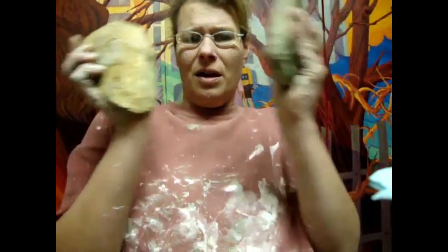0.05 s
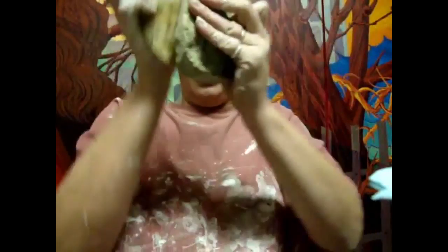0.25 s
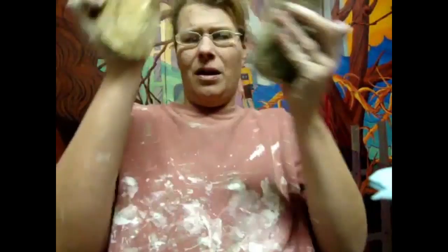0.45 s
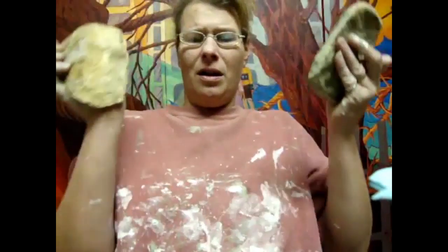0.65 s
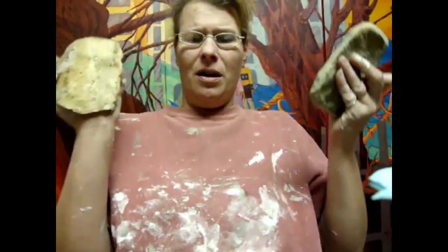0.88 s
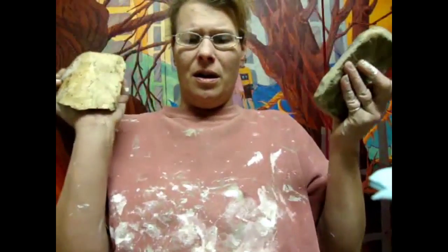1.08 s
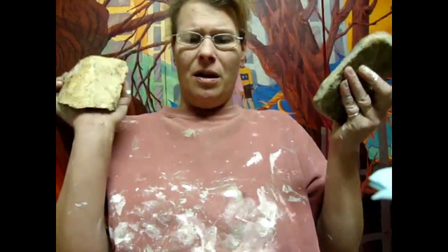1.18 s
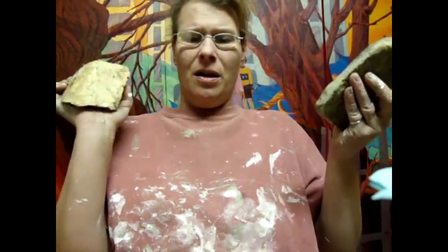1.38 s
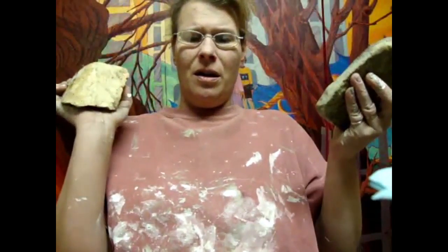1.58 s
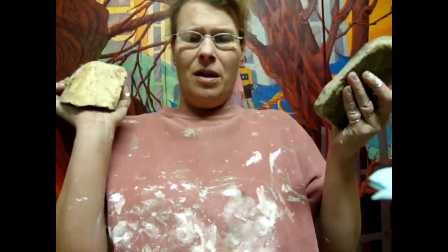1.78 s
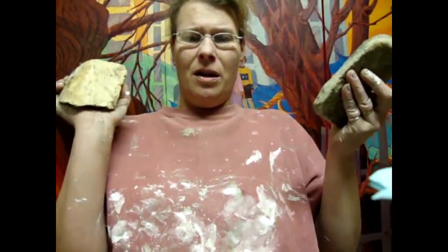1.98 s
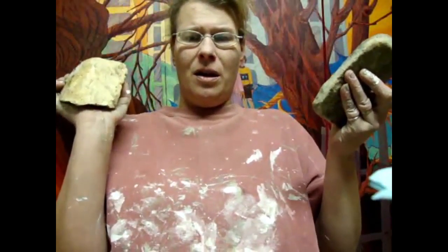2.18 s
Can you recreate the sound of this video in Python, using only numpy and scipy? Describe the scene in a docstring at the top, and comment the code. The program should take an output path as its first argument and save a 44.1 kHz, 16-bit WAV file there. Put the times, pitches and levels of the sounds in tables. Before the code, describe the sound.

A single sharp knock of stone on stone, with a short room echo.

```python
"""One sharp knock of two hand-held rocks, in a quiet, hard-walled room.
The contact sends a single pressure pulse straight to the microphone, with a little grit and a brief
ring of the stones. From farther off, the walls return a few strong echoes and a dense tail.
The knock overloads the microphone; its hiss and faint background noise lie underneath."""
import sys
import numpy as np
from scipy import signal
from scipy.fft import rfft, irfft
from scipy.io import wavfile
from scipy.ndimage import uniform_filter1d

SR = 44100
rng = np.random.default_rng(int(sys.argv[2]) if len(sys.argv) > 2 else 0)


def int16_out(signal):
    """Quantize to a 16-bit WAV file."""
    q = np.round(np.clip(np.atleast_2d(signal).T, -1, 1) * 32767)
    wavfile.write(sys.argv[1], SR, q.astype(np.int16))


N = 99225
KNOCK_S = .2418


def amp(db):
    """Decibels to gain."""
    return 10 ** (np.asarray(db) / 20)


def unit_rms(x):
    """Scales to rms 1."""
    return x / np.sqrt(np.mean(x ** 2) + 1e-20)


def value_at(points, hz):
    """Reads a table on a log-frequency axis."""
    table_hz, value = np.transpose(points)
    return np.interp(np.log(hz + 1), np.log(table_hz + 1), value)


def add(mix, start_s, sound):
    """Mixes a sound in at start_s."""
    part = mix[round(start_s * SR):][:len(sound)]
    part += sound[:len(part)]


def coloured(noise, spectrum):
    """Gives a noise its spectrum, at rms 1."""
    gain = amp(value_at(spectrum, np.fft.rfftfreq(len(noise), 1 / SR)))
    return unit_rms(irfft(rfft(noise) * gain, len(noise)))


def band(x, low_hz, top_hz):
    """Gentle high-pass and steeper low-pass."""
    x = signal.lfilter(*signal.butter(1, low_hz, "high", fs=SR), x)
    return signal.lfilter(*signal.butter(2, min(top_hz, SR / 2 - 1), fs=SR), x)


def microphone_hiss(level_db=-60.5):
    """The microphone's own steady noise floor."""
    # hiss spectrum: frequency_hz, relative_db
    spectrum = [(30, -10.5), (300, -7), (1000, 0), (2500, 0.5), (5000, 0), (8000, 0.5), (9900, -0.5),
                (10250, -14), (16000, -14.5)]
    return amp(level_db) * coloured(rng.standard_normal(N), spectrum)


def background_noise(patch_db=1):
    """Faint background noise; the recorder's gain ducks it after the knock, then slowly recovers."""
    # background noise spectrum: frequency_hz, relative_db
    spectrum = [(20, -9), (60, -10.5), (130, -4.5), (250, 1), (550, 0), (1000, -3.5), (2000, -9),
                (4000, -15.5), (9000, -41.5), (16000, -58.5)]
    # noise level as the recorder's gain ducks and recovers: time_s, level_db
    levels = [(0, -61.5), (.24, -61.5), (.5, -69.5), (.7, -74.5), (.8, -64), (1.1, -64.5), (1.301, -61.5),
              (1.799, -59), (2.25, -57.5)]
    bins = signal.stft(rng.standard_normal(N), nperseg=1024)[2]
    patches = uniform_filter1d(rng.standard_normal(bins.shape), size=8, axis=0)  # smooth in frequency
    patches = unit_rms(uniform_filter1d(patches, size=6, axis=1))  # and in time
    shifting = signal.istft(bins * amp(patch_db * patches), nperseg=1024)[1][:N]
    level_db = np.interp(np.arange(N) / SR, *np.transpose(levels))
    return amp(level_db) * coloured(shifting, spectrum)


def reflections(per_s=2000, diffuse_db=-1.5, clump_db=.7):
    """One second of separate reflections over a diffuse wash, arriving in clumps."""
    clumps = unit_rms(uniform_filter1d(rng.standard_normal(SR), size=70))
    taps = unit_rms(np.sign(rng.standard_normal(SR)) * (rng.random(SR) < per_s / SR))
    wash = amp(diffuse_db) * rng.standard_normal(SR)
    return (taps + wash) * amp(clump_db * clumps)


def room_decay(sound, build_s=.0022, sag_s=.087, sag_db=8):
    """Sound between the walls builds up, sags, then dies away band by band."""
    # the room's reverberation time: frequency_hz, t60_s
    decay_times = [(60, .4), (300, 0.36), (900, 0.45), (2000, 0.4), (4000, 0.29), (8000, 0.27),
                   (15000, 0.37)]
    hz, t, bins = signal.stft(sound, SR, nperseg=256)
    early_db = sag_db * np.minimum(t / sag_s, 1)
    late_db = 60 * np.maximum(t - sag_s, 0) / value_at(decay_times, hz)[:, None]
    fading = signal.istft(bins * amp(-early_db - late_db), SR, nperseg=256)[1][:len(sound)]
    build_up = 1 - np.exp(-np.arange(len(fading)) / SR / build_s)
    return fading * build_up


def room_tail(wash_db=-14, tones_db=-23):
    """The room's answer to the pulse: a dense wash with a few pitches standing out."""
    # reverberation spectrum: frequency_hz, relative_db
    spectrum = [(40, -43), (120, -34.5), (330, -31.5), (600, -17.5), (950, -5.5), (1400, -2), (2100, 0),
                (3100, -6), (4200, -10), (4900, -12.5), (5400, -21), (7200, -20), (8000, -30.5),
                (10200, -22.5), (12100, -34), (14400, -18.5), (16000, -29)]
    # tones in the reverberation: pitch_hz, relative_db
    pitches = [(740, -12), (873, -13), (1409, -7), (1972, 1), (2036, -1), (2088, -6), (2172, -5),
               (2848, -8), (4865, -7)]
    t = np.arange(SR) / SR
    tones = sum(amp(db) * np.sin(2 * np.pi * (hz * t + rng.random())) for hz, db in pitches)
    wash = coloured(reflections(), spectrum)
    return room_decay(amp(wash_db) * wash + amp(tones_db) * tones)


def wall_echo(pulse, peak_db, low_hz=1505, top_hz=5970, scatter_s=.00093, scatter_db=5):
    """The pulse comes back off a wall without its bass, trailed by a short scatter."""
    t = np.arange(SR // 100) / SR
    scatter = band(rng.standard_normal(len(t)) * np.exp(-t / scatter_s), top_hz / 2, SR / 2)
    taps = signal.unit_impulse(len(t)) + amp(scatter_db) * scatter / np.linalg.norm(scatter)
    reflected = signal.fftconvolve(pulse, taps)
    thin = signal.lfilter(*signal.butter(2, low_hz, "high", fs=SR), reflected)
    dulled = signal.lfilter(*signal.butter(1, top_hz, fs=SR), thin)
    return amp(peak_db) * dulled / abs(dulled).max()


def contact_grit(level_db=-17, decay_s=.006):
    """Grains crush at the point of contact for a few milliseconds."""
    t = np.arange(SR // 10) / SR
    crunch = unit_rms(band(rng.standard_normal(len(t)), low_hz=1000, top_hz=5000))
    return amp(level_db) * np.exp(-t / decay_s) * crunch


def stone_ring():
    """The stones ring in their modes, quickly damped by the hands."""
    # modes of the stones: pitch_hz, relative_db, t60_s
    modes = [(4657, -16, .075), (4715, -18, .07), (4797, -19, .07), (4865, -13, .09), (4925, -18, .06),
             (6520, -17, .045), (6640, -12, .05), (6850, -18, .04)]
    t = np.arange(SR // 2) / SR
    return sum(amp(db - 60 * t / t60) * np.sin(2 * np.pi * hz * t) for hz, db, t60 in modes)


def contact_pulse(contact_s=.00017):
    """The stones stop each other: a short suction and its rebound."""
    progress = np.arange(SR // 20) / SR / contact_s
    return -2 * np.e * progress * (1 - progress / 2) * np.exp(-progress)


def knock(first_wall_s=.005):
    """Pulse, grit and ring reach the microphone directly; the room's tail and echoes follow."""
    # strong wall echoes at the microphone: start_s, peak_db
    echoes = [(.2493, -10), (.2517, -7), (.2569, -4), (.258, -8), (.2725, -11), (.2852, -7), (.2867, 0),
              (.2877, -4), (.2965, -10), (.3024, -6), (.3033, -6), (.3042, -6), (.3395, -15), (.345, -14),
              (.3534, -10), (.367, -14)]
    mix, pulse, ring = np.zeros(N), contact_pulse(), stone_ring()
    add(mix, KNOCK_S, amp(-1) * band(pulse, low_hz=108, top_hz=4000))
    add(mix, KNOCK_S, contact_grit())
    add(mix, KNOCK_S, amp(-2.5) * ring)
    add(mix, KNOCK_S + first_wall_s, room_tail())
    room = room_decay(reflections())
    ring_in_room = signal.fftconvolve(ring, room / np.linalg.norm(room))
    add(mix, KNOCK_S + first_wall_s, amp(-5) * ring_in_room)
    for start_s, peak_db in echoes:
        add(mix, start_s, wall_echo(pulse, peak_db))
    return mix


def scene():
    """The knock in the quiet room, on one microphone."""
    return (knock() + background_noise() + microphone_hiss())[None]


def record(dry):
    """The overloaded microphone rounds off the highest peaks; then the top treble is cut."""
    ceiling, cutoff_hz = .81, 15850
    rounded = dry / (1 + (dry / ceiling) ** 4) ** .25
    low_pass = signal.firwin(511, cutoff_hz, window=("kaiser", 9), fs=SR)
    return signal.oaconvolve(rounded, low_pass[None], "same")


dry = scene()
out = record(dry)
int16_out(out)
```